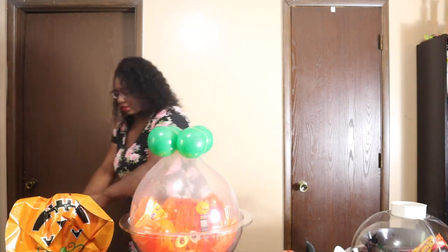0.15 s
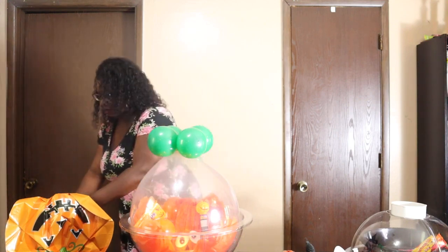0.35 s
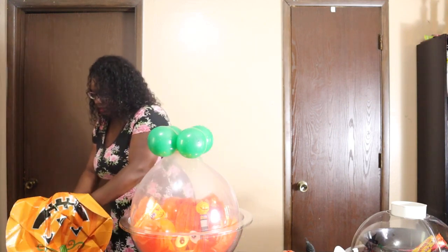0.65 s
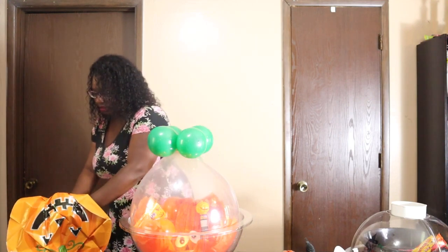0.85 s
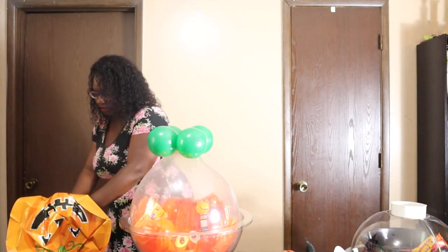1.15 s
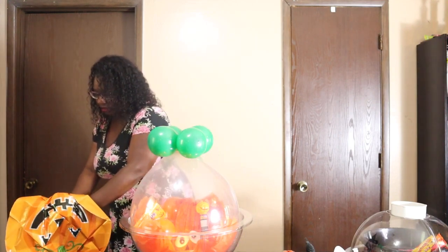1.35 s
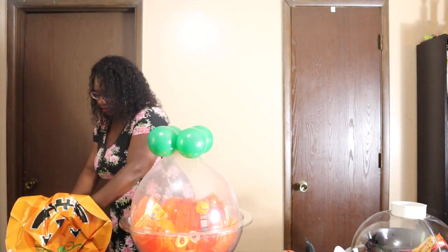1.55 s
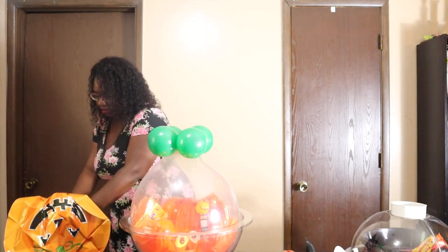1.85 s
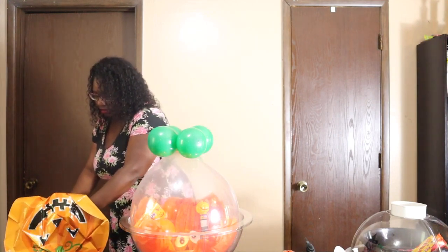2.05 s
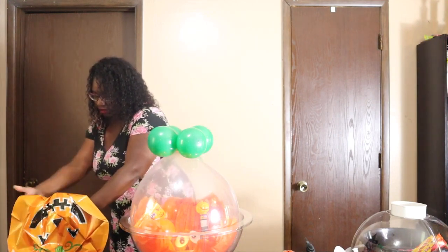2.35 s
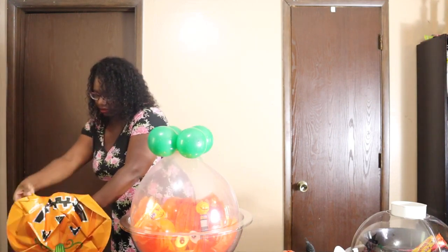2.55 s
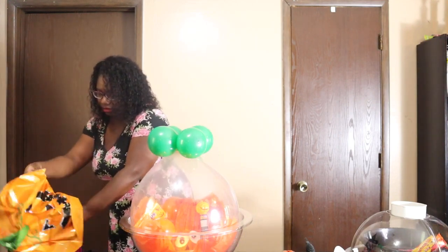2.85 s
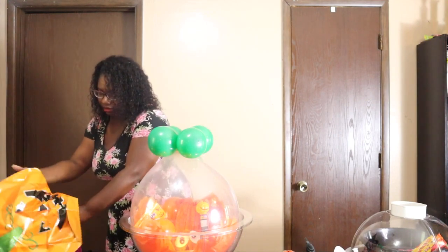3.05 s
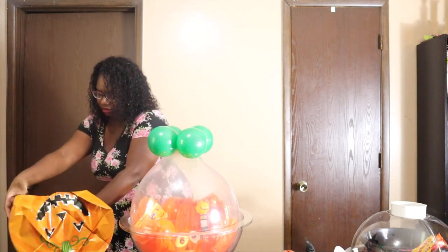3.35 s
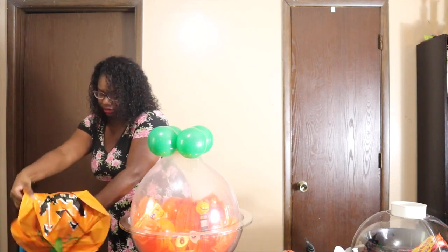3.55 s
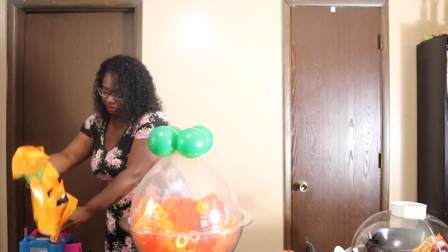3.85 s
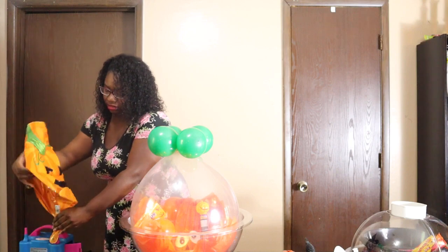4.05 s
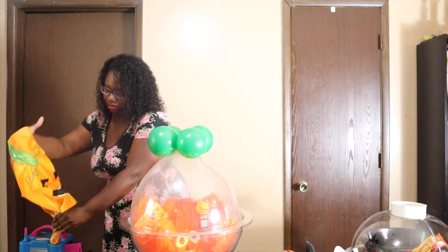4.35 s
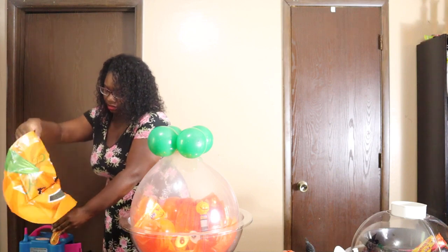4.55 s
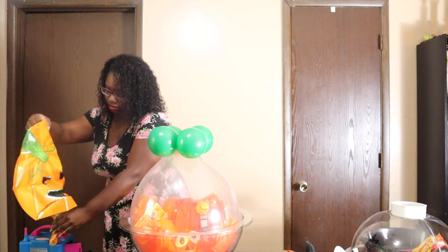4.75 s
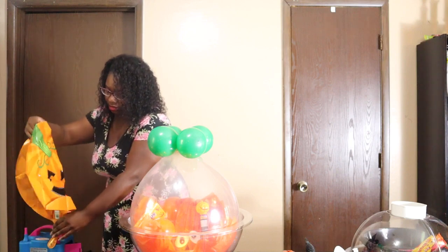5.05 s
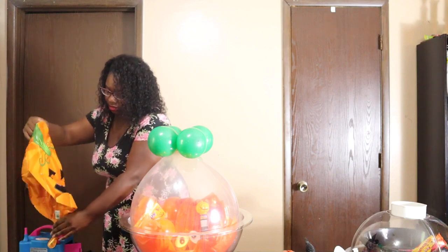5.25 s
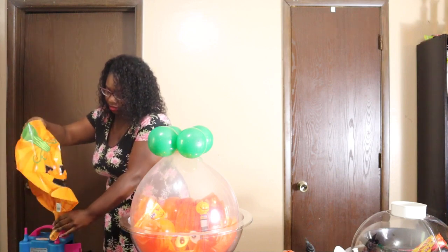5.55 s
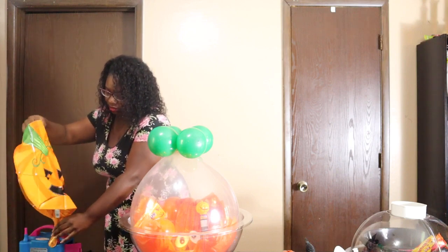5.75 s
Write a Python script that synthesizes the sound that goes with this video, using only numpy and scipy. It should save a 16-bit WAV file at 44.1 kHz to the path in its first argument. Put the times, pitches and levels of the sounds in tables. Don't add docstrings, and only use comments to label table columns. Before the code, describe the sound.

A hand touches foil beside a balloon blower, with faint crackles and knocks over soft room hum. Just before one second the switch clunks; the motor climbs with a buzzing, gritty chirp to a steady hum and shrill whistle, wrapped in broad air noise. The tone flutters slightly as the balloon moves. Close, wide stereo indoor pickup, automatically ducked, still running at the end.

```python
import sys
import numpy as np
from scipy import signal
from scipy.fft import rfft, irfft, next_fast_len
from scipy.io import wavfile
from scipy.ndimage import uniform_filter1d, minimum_filter1d, map_coordinates

SR = 44100
rng = np.random.default_rng(int(sys.argv[2]) if len(sys.argv) > 2 else 0)


def log_audio(samples):
    frames = np.atleast_2d(samples).T
    limited = np.clip(frames, -1, 1)
    pcm = np.round(limited * 32767).astype(np.int16)
    wavfile.write(sys.argv[1], SR, pcm)


def gain_from_db(level_db):
    decades = np.asarray(level_db, float) / 20
    return 10 ** decades


N = 261072

SWITCH_S = .79
FULL_HZ = 720
# t/s, level/dB
GAIN = [
    (0, 1),
    (.15, -1),
    (.5, -2),
    (.78, -0.5),
    (.95, -0.5),
    (1.55, -12),
    (1.9, -13),
    (5.92, -13.5),
]


def clock():
    return np.arange(N) / SR


def unit(x):
    return x / np.sqrt(np.mean(x ** 2) + 1e-20)


def along(points, hz):
    f, v = np.transpose(points)
    return np.interp(np.log(hz + 1), np.log(f + 1), v)


def curve(rows):
    s, value = np.transpose(rows)
    return np.interp(clock(), s, value)


def swells(rows):
    return sum(db * np.exp(-((clock() - s) / half) ** 2) for s, half, db in rows)


def wobble(rate):
    knots = rng.standard_normal(int(N * rate / SR) + 4)
    return map_coordinates(knots, [np.arange(N) * rate / SR])


def filtered(x, response):
    m = next_fast_len(N + SR // 2)
    spectrum = rfft(x, m) * response(np.fft.rfftfreq(m, 1 / SR))
    return irfft(spectrum, m)[..., :N]


def resonance(f, hz, width):
    return 1j * f * width / (hz * hz - f * f + 1j * f * width)


def bumps_db(f, modes):
    return sum(db * abs(resonance(f, hz, width)) ** 2 for hz, width, db in modes)


def widened(pair):
    # f/Hz, level/dB
    wide = [(60, -32), (110, -23), (200, -36), (370, -14), (690, -7), (1260, -0.5), (2320, 2), (4260, 6),
            (7820, 8), (14400, 9)]
    # f/Hz, share/0-1
    leaning = [(200, 0.24), (400, 0.6), (750, 0.26), (1500, 0.24), (10000, 0.25)]

    def to_side(f):
        lean = np.clip(along(leaning, f), 0, 1)
        return gain_from_db(along(wide, f)) * [lean, np.sqrt(1 - lean ** 2)]

    side = filtered(pair, to_side).sum(axis=0)
    return np.array([pair[0] + side, pair[0] - side])


def rush(colour_db, patchy_db):
    z = signal.stft(rng.standard_normal((2, N)), nperseg=512)[2]
    field = uniform_filter1d(rng.standard_normal(z.shape[1:]), 6, 0)
    field = uniform_filter1d(field, 10, 1)
    pair = signal.istft(z * gain_from_db(patchy_db * unit(field)), nperseg=512)[1][:, :N]
    return unit(filtered(pair, lambda f: gain_from_db(colour_db(f))))


def room(x):
    # f/Hz, t/s
    walls = [(150, 0.48), (1000, 0.25), (4000, 0.37), (12000, 0.28)]
    hz, t, z = signal.stft(rng.standard_normal((2, SR)), SR, nperseg=256)
    fall = gain_from_db(-60 * t / along(walls, hz)[:, None])
    tail = signal.istft(z * fall, SR, nperseg=256)[1]
    tail = tail / np.linalg.norm(tail[0])
    late = np.pad(x, (300, 0))
    return signal.fftconvolve(late[None], tail, axes=1)[:, :N]


def room_tone():
    # f/Hz, level/dB
    murmur_colour = [(18, -69), (30, -14), (86, -24), (100, -9.5), (130, 0.5), (168, -12), (254, -7.5),
                     (281, -9.5), (403, -6), (674, -15.5), (1880, -25), (5990, -41.5), (14000, -62)]
    # f/Hz, level over the murmur/dB, phase wander/rad
    building_hums = [(118, -15.5, 0.96), (142.2, -8, 0.25), (517, -7.5, 1.4)]
    hum = sum(gain_from_db(db) * np.sin(2 * np.pi * hz * clock() + rad * wobble(6.8))
              for hz, db, rad in building_hums)
    murmur = rush(lambda f: along(murmur_colour, f), patchy_db=1.7)
    rumble_colour = [(30, -3), (100, -9), (250, 8), (600, -26)]  # f/Hz, level/dB
    rumble = gain_from_db(-14.0) * rush(lambda f: along(rumble_colour, f), patchy_db=-3.0)
    room_db = -40
    return gain_from_db(room_db + curve(GAIN)) * (widened(murmur + hum * [[1], [0]]) + rumble)


def touches():
    # t/s, peak level/dB, f/Hz, time to fall by 60 dB/s
    bursts = [(.001, -27, 855, 0.22), (.002, -39, 1510, 0.57), (.003, -56, 1900, 1.17),
              (.004, -66, 3730, 0.9), (.383, -62, 12000, .04), (.401, -62, 9000, .12),
              (.402, -62, 13000, .1), (.485, -63, 10000, .08), (.525, -63, 10500, .1),
              (.597, -41, 2070, 0.097), (0.638, -36, 1210, .25), (0.655, -57, 3060, 0.25),
              (.778, -58, 10000, 0.045), (0.786, -29, 1510, 0.038), (0.789, -35, 7250, 0.047),
              (0.801, -31, 940, 0.12), (0.813, -6, 141, 0.25)]
    out, t = np.zeros((2, N)), np.arange(SR) / SR
    for s, db, hz, t60 in bursts:
        burst = np.zeros((2, N))
        burst[:, round(s * SR):][:, :SR] = gain_from_db(db - 60 * t / t60) * rng.standard_normal((2, SR))
        out += filtered(burst, lambda f: 0.015 + 3 * resonance(f, hz, 0.21 * hz))
    return widened(out)


def powered():
    return np.clip((clock() - SWITCH_S) / 0.0046, 0, 1)


def shaft_hz():
    # t/s, f/Hz
    loaded = [
        (0, 724),
        (2.4, 723.5),
        (3.4, 721),
        (4.4, 719.3),
        (5.2, 720.4),
        (5.92, 716.5),
    ]
    torque_s, quick_s, slow_s, quick_share = .781, .075, .255, .35
    t = np.maximum(clock() - torque_s, 0)
    lag = quick_share * np.exp(-t / quick_s) + (1 - quick_share) * np.exp(-t / slow_s)
    return curve(loaded) * (1 - lag)


def shaft_angle():
    return 2 * np.pi * np.cumsum(shaft_hz() + .5 * wobble(12)) / SR


def run_up():
    return shaft_hz() / FULL_HZ


def gliding():
    return np.clip(6 * (.97 - run_up()), 0, 1)


def smeared(sound, sent):
    return (1 - .5 * gliding()) * sound + gain_from_db(-2) * widened(room(gliding() * sent))


def tone(turns, order, left_db, lead, flutter_db, rate):
    side = np.array([[.5], [-.5]])
    flutter = np.array([wobble(rate), wobble(rate)]) + wobble(rate)
    level = gain_from_db(side * left_db + flutter_db * flutter)
    return np.sqrt(2) * level * np.sin(order * turns + side * lead)


def shaft_hum(turns):
    # waves a turn, level under the shaft tone/dB
    shaft_orders = [(2, -25.5), (3, -24)]
    # f/Hz, width/Hz, level/dB
    mount = [(151, 44, 0), (223, 39, -9), (290, 90, 13), (362, 35, -11), (415, 37, 6), (467, 30, -3),
             (523, 34, 4), (577, 50, 0), (648, 22, 10.5), (658.4, 5.9, -14), (685, 26, 6),
             (734.4, 162, 19.5)]
    hz, speed = shaft_hz(), run_up()
    hum = tone(turns, order=1, left_db=6.2 * speed ** 2, lead=0.23 * speed, flutter_db=0.0, rate=29)
    for order, db in shaft_orders:
        hum = hum + gain_from_db(db) * tone(turns, order, left_db=-6.0, lead=1.6, flutter_db=0.5, rate=15)
    crossing = abs(resonance(2 * hz, hz=1237, width=70)) ** 2
    second = tone(turns, order=2, left_db=11.0, lead=1.4, flutter_db=0.0, rate=16)
    hum = hum + gain_from_db(-6.5) * crossing * second
    shaft_db = -24 + bumps_db(hz, mount)
    hum = powered() * gain_from_db(curve(GAIN) + shaft_db) * speed ** 0.65 * hum
    return smeared(hum, hum.mean(axis=0))


def blade_whistle(turns):
    # waves a turn, level under the blade tone/dB
    blade_orders = [(5, -19), (8, -52), (9, -14.5)]
    # t/s, lead of the left/rad
    whistle_lead = [
        (.79, 1.6),
        (2.2, 1.86),
        (3.2, 2.26),
        (3.7, 1.4),
        (4.3, 1.7),
        (5.3, 1.4),
        (5.92, 2.4),
    ]
    # t/s, half length/s, level/dB
    mirror = [(1.5, 0.035, -10), (1.63, 0.088, 6.5), (1.76, 0.027, -10), (2.12, 0.077, 4.5),
              (2.34, 0.033, -9), (2.78, 0.27, 5), (3.57, 0.13, 6.5), (3.73, 0.067, -7.5), (4, 0.23, 2.5),
              (4.77, 0.056, -10), (5.12, 0.5, 3), (5.6, 0.085, -6), (5.9, .12, 0)]
    flutter_db = 1.2 + 2.5 * gliding()
    blades = tone(turns, order=7, left_db=2.9, lead=curve(whistle_lead), flutter_db=flutter_db, rate=13)
    for order, db in blade_orders:
        blades = blades + gain_from_db(db) * tone(turns, order, left_db=-4.5, lead=2.3, flutter_db=5.0, rate=16)
    blade_db = -22.5 + swells(mirror)
    return powered() * gain_from_db(curve(GAIN) + blade_db) * run_up() ** 6.1 * blades


def brush_chirp(turns, blades):
    # f/Hz, width/Hz, level/dB
    can_modes = [(950, 300, -3), (1900, 600, -3), (3150, 200, 11), (3350, 150, 17), (3500, 110, 18)]
    start_db, hold_s, fall_db, fall_s = -23, .866, 44, .13
    brush_db = start_db - fall_db * (1 - np.exp(-np.maximum(clock() - hold_s, 0) / fall_s))
    bars = np.sin(12 * turns) + .17 * np.sin(24 * turns)
    mains = 1 + .8 * np.cos(2 * np.pi * 120 * (clock() - .859))
    sparks = powered() * gain_from_db(brush_db) * mains * (bars + .35 * rng.standard_normal(N))

    def ringing(f):
        modes = sum(gain_from_db(db) * resonance(f, hz, width) for hz, width, db in can_modes)
        passed = .35 + (1 - .35) / (1 + (f / 3700) ** 20)
        return (.25 / (1 + (f / 5000) ** 4) + modes) * passed

    can = filtered(sparks + 0.41 * gliding() * blades[0], ringing)
    return widened(gain_from_db(-7) * room(can) + gain_from_db([[-2.5], [-5]]) * can)


def rotor():
    turns = shaft_angle()
    blades = blade_whistle(turns)
    return shaft_hum(turns) + smeared(blades, blades[0]) + brush_chirp(turns, blades)


def air():
    # f/Hz, width/Hz, level over the roar/dB
    shell = [(242, 19, 6), (296, 15, 8.5), (440, 18, -10), (477.5, 49, 6), (609, 10, 3.5), (727, 122, 12.5),
             (848.4, 12.4, 7.5), (986, 24, 7), (1017.5, 11.5, 9), (1254, 110, 4.5), (1410, 18, 6.5),
             (2020, 47, -7.5), (2017, 146, 10), (2273, 174, 5.5), (3055, 164, -4.5), (3200, 99, 3.5),
             (3575, 71, 7), (7610, 750, 3), (12460, 220, 4.5)]
    # f/Hz, level/dB
    roar_colour = [(25, -54), (60, -26.5), (120, -22), (250, -18), (450, -10), (620, -6.5), (800, -1),
                   (1000, -7), (1600, -10), (2600, -14), (4000, -18), (7000, -27), (15000, -83)]
    # f/Hz, level/dB
    hiss_colour = [(1500, -22), (3000, -3.5), (5000, -3), (8000, -6), (9300, -8), (10600, -3.5),
                   (12500, -7)]
    # t/s, half length/s, level/dB
    leaks = [
        (2.43, 0.05, 2),
        (5.6, 0.094, 1),
        (5.8, 0.39, 3),
    ]
    speed, running = run_up(), clock() - SWITCH_S
    flow_db = curve(GAIN) - 0.4171 * running
    gust = wobble(6.88)

    shudder = gain_from_db(-20) * np.maximum(1 - speed, 0) ** 2
    stir = gain_from_db(-10) * speed ** 2.05 + shudder
    roar = rush(lambda f: along(roar_colour, f) + bumps_db(f, shell), patchy_db=0.4)
    roar = stir * gain_from_db(flow_db + 0.62 * gust) * roar
    slow = np.clip(2.2 * (1 - speed), 0, .7)
    roar = roar - slow * filtered(roar, lambda f: resonance(f, hz=730, width=90))

    spit = gain_from_db(-26 - 60 * np.maximum(running, 0) / .13)
    jet = gain_from_db(-19 + swells(leaks)) * speed ** 3.4 + spit
    hiss = rush(lambda f: along(hiss_colour, f) + bumps_db(f, shell), patchy_db=0.93)
    hiss = jet * gain_from_db(flow_db + 0.22 * gust + 0.16 * wobble(22)) * hiss

    flow = powered() * (roar + hiss)
    return widened(flow + gain_from_db(-3) * room(flow[0]))


def scene():
    return room_tone() + touches() + rotor() + air()


def low_pass(x):
    return signal.sosfilt(signal.butter(12, 14980, fs=SR, output="sos"), x)


def record(dry):
    # f/Hz, level/dB
    capsule = [(12500, 0), (13000, -5), (13600, -7), (14000, -10), (14400, -11), (15000, -16)]
    dull = filtered(dry, lambda f: gain_from_db(along(capsule, f)))
    need = np.minimum(1, .9 / (abs(dull).max(axis=0) + 1e-9))
    gain = uniform_filter1d(minimum_filter1d(need, size=200), size=100)
    return low_pass(dull * gain)


dry = scene()
out = record(dry)
log_audio(out)
```